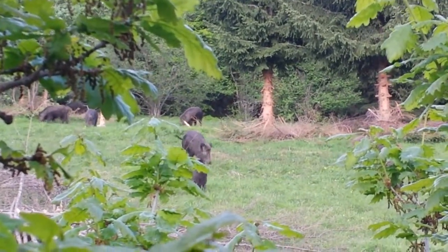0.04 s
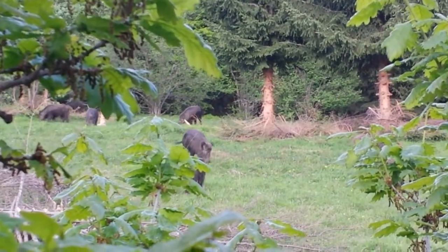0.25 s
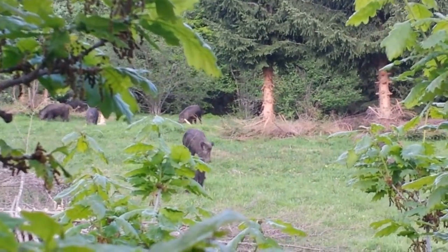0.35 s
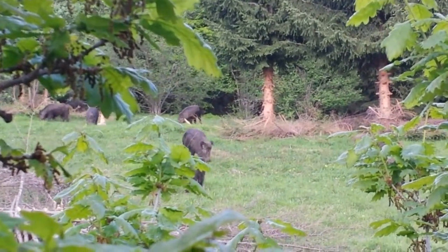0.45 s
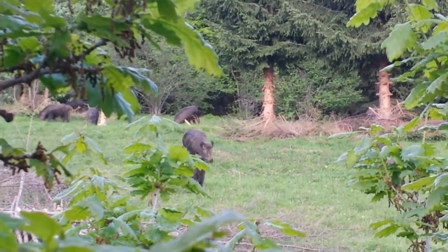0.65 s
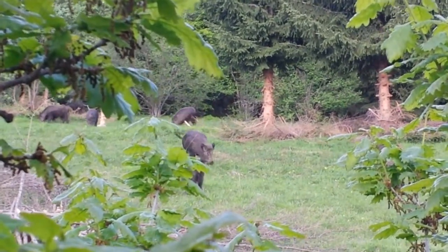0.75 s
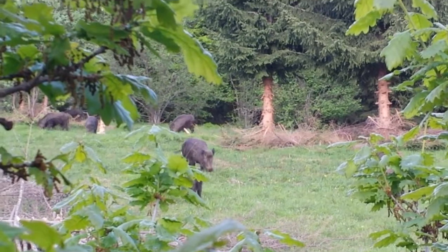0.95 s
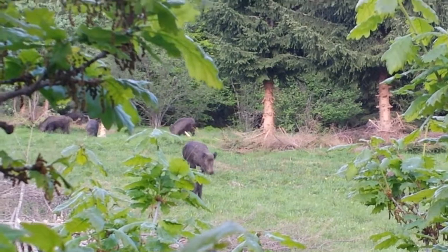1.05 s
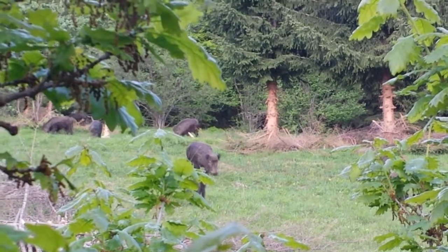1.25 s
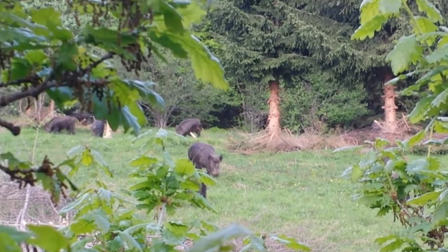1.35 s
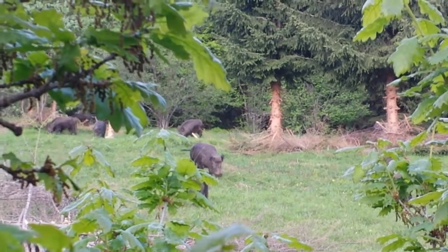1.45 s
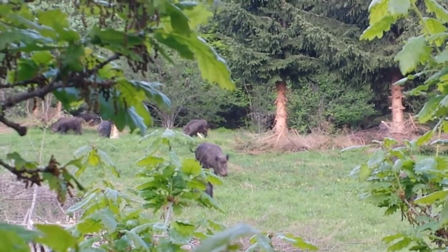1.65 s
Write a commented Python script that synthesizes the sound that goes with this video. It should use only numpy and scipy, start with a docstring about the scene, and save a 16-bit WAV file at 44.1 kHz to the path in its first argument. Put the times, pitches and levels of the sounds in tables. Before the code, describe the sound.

A songbird sings a chirpy phrase with a long high whistle, faint birds far behind.

```python
"""Faint, far-off bird calls come first, over soft outdoor hiss and a low hum at a forest edge.
Then a near songbird sings one phrase: a falling slur, thin chirps, a long high whistle and,
starting with a soft tick, a lower twitter. Each note is a gliding pure tone, at times two at once;
leaves scatter it and the trees answer with a long reverberant tail."""
import sys
import numpy as np
from scipy import signal
from scipy.fft import rfft, irfft
from scipy.io import wavfile
from scipy.ndimage import uniform_filter1d, map_coordinates

SR = 44100
rng = np.random.default_rng(int(sys.argv[2]) if len(sys.argv) > 2 else 0)


def generate_wav(signal):
    """Clip the signal to [-1, 1] and save it as 16-bit WAV at the path in sys.argv[1]."""
    frames = np.transpose(np.atleast_2d(signal))
    scaled = np.clip(frames, -1, 1) * 32767
    pcm = np.round(scaled).astype(np.int16)
    wavfile.write(sys.argv[1], SR, pcm)


N = 74970


def undb(db):
    """The decibel scale: 20 dB is a tenfold amplitude."""
    return 10 ** (np.asarray(db) / 20)


def pan(balance_db):
    """Interaural level difference: gains of constant power, the left greater by balance_db."""
    gains = undb(np.array([[balance_db], [-balance_db]]) / 2)
    return gains / np.sqrt(np.mean(gains ** 2))


def drift(rate_hz):
    """Low-pass noise: random steps smoothed into a slow wander of unit spread."""
    hold = max(int(SR / rate_hz), 2)
    steps = np.repeat(rng.standard_normal(N)[:N // hold + 1], hold)
    smooth = uniform_filter1d(uniform_filter1d(steps, hold), hold)[:N]
    return smooth / smooth.std()


def noise(spectrum, side_db=-1):
    """Spectral shaping: white noise filtered to a given spectrum, in wide stereo at unit level."""
    hz, db = np.array(spectrum, float).T
    bin_hz = np.arange(N // 2 + 1) * SR / N
    gain = undb(np.interp(np.log(bin_hz + 1), np.log(hz), db))
    mid, side = irfft(rfft(rng.standard_normal((2, N))) * gain, N)
    stereo = mid + undb(side_db) * side * np.array([[1], [-1]])
    return stereo / stereo.std()


# Partials of the hum: harmonic_number, relative_level_db
HUM_HARMONICS = [(1, -1.5), (2, -14.5), (3, -23), (4, -21), (5, -21.5)]
def hum(t, pitch_hz=216.84, waver=0.00586):
    """Harmonic series: partials at whole multiples of one slightly wavering fundamental."""
    phase = 2 * np.pi * np.cumsum(pitch_hz * (1 + waver * drift(rate_hz=16))) / SR
    return np.sqrt(2) * sum(undb(db) * np.sin(number * phase) for number, db in HUM_HARMONICS)


# Spectral densities of the three noise bands: frequency_hz, relative_level_db
AIR_SPECTRUM = [(100, -30), (220, 4), (320, 8), (500, -0.5), (1000, -3), (2000, -3), (3300, -1),
                (4500, -0.5), (7000, -3.5), (14000, -60)]
HISS_SPECTRUM = [(1000, -1), (4000, -24.5), (7000, 3), (10000, 0), (14500, -3.5)]
RUMBLE_SPECTRUM = [(20, -21), (50, -8.5), (95, -2), (160, -4.5), (240, -10), (400, -49.5)]
# Envelopes, before each layer's own gain: time_s, air_db, hiss_db, hum_db, rumble_db
BACKGROUND_LEVELS = [(0.0, -78, -77, -70.5, -75), (0.416, -68.5, -68.5, -65, -70),
                     (0.434, -68, -69, -64.5, -67.5), (0.62, -68.5, -68.5, -73.5, -69),
                     (0.638, -68, -67.5, -60.5, -68), (1.386, -70, -68, -61, -68.5),
                     (1.7, -78.5, -75.5, -68.5, -78.5)]
def background(t):
    """Amplitude envelopes: airy noise, hiss, rumble and a hum on the left each swell and sink."""
    time_s, *levels_db = np.array(BACKGROUND_LEVELS).T
    air_gain, hiss_gain, hum_gain, rumble_gain = (undb(np.interp(t, time_s, db)) for db in levels_db)
    drone = undb(1) * hum_gain * hum(t) * pan(29)
    air = undb(9) * air_gain * noise(AIR_SPECTRUM)
    hiss = undb(5.5) * hiss_gain * noise(HISS_SPECTRUM)
    rumble = undb(3) * rumble_gain * noise(RUMBLE_SPECTRUM)
    return air + hiss + rumble + drone


def tick(t, time_s=1.172, band_hz=2100, level_db=-54, width_s=0.0017):
    """A transient: band noise under a brief Gaussian envelope is heard as a soft dry tick."""
    band = [(band_hz / 4, -30), (band_hz * 0.6, 0), (band_hz * 1.05, 0), (band_hz * 4, -25)]
    return undb(level_db) * noise(band) * np.exp(-((t - time_s) / width_s) ** 2)


def scatter(sound, t60_s, delay_s, build_s):
    """Diffuse scattering: countless reflections build up and die away, different at each ear."""
    age_s = np.maximum(np.arange(N) / SR - delay_s, 0)
    envelope = (1 - np.exp(-age_s / build_s)) * np.exp(-np.log(1000) * age_s / t60_s)
    tail = rng.standard_normal((2, N)) * envelope
    tail /= np.sqrt(np.sum(tail ** 2, axis=1, keepdims=True))
    return signal.fftconvolve(sound[None], tail, axes=1)[:, :N]


def forest(sound, tilt_db_per_octave=-2.5):
    """Reverberation: the trees return a long tail, weaker for higher notes."""
    bin_hz = np.arange(N // 2 + 1) * SR / N
    octaves = np.log2(np.maximum(bin_hz, 2000) / 5000)  # flat below 2 kHz, unity gain at 5 kHz
    dulled = irfft(rfft(sound) * undb(tilt_db_per_octave * octaves), N)
    return scatter(dulled, t60_s=0.95, delay_s=0.012, build_s=0.0098) * pan(1)


def whistle(pitch_hz, rasp_hz=5430, rasp_width_hz=680, flutter_db=2.4):
    """Frequency and amplitude modulation: a pure tone wavers, flutters and rasps in mid register."""
    rasp = 0.0197 * np.exp(-((pitch_hz - rasp_hz) / rasp_width_hz) ** 2) * drift(rate_hz=670)
    waver = 0.0027 * drift(rate_hz=220)
    phase = 2 * np.pi * np.cumsum(pitch_hz * (1 + waver + rasp)) / SR
    return np.sqrt(2) * np.sin(phase) * undb(flutter_db * drift(rate_hz=120))


# Distant calls: start_s, length_s, first_hz, middle_hz, last_hz, level_db
DISTANT_CALLS = [ (.0, .06, 3950, 3750, 3800, -78), (.0, .03, 3280, 3250, 3240, -72),
                 (.035, .11, 3260, 3220, 3234, -75), (0.183, 0.049, 2850, 2390, 2550, -62.5),
                 (0.219, 0.029, 2650, 2720, 2780, -64), (0.466, 0.041, 3180, 3210, 3280, -67),
                 (0.598, 0.041, 2950, 2673, 3050, -59), (0.78, 0.076, 4400, 4360, 4290, -68.5),
                 (0.896, 0.13, 2480, 2464, 2437, -70.5), (0.959, 0.039, 3130, 3135, 3320, -68),
                 (1.102, 0.036, 2980, 2690, 2890, -61.5), (1.153, 0.024, 2900, 2947, 2800, -66),
                 (1.319, 0.017, 3300, 3286, 3100, -58), (1.375, 0.02, 3240, 3206, 3210, -57.5),
                 (1.432, 0.015, 3250, 2990, 3170, -64.5), (1.478, 0.044, 3180, 3280, 3390, -63),
                 (1.504, 0.054, 2880, 2500, 3030, -69), (1.565, 0.01, 2850, 2730, 2700, -57), ]
def far_birds(t, reverb_db=-2.5):
    """Direct-to-reverberant ratio: short curved whistles, about as strong as their tail, sound far."""
    calls = 0
    for start_s, length_s, first_hz, middle_hz, last_hz, level_db in DISTANT_CALLS:
        progress = np.clip((t - start_s) / length_s, 0, 1)
        parabola = np.polyfit([0, .5, 1], [first_hz, middle_hz, last_hz], 2)
        arch = np.sqrt(1 - (2 * progress - 1) ** 2)
        calls += whistle(np.polyval(parabola, progress)) * undb(level_db) * arch
    return calls + undb(reverb_db) * forest(calls)


# Notes of the phrase: balance_db, leaves_send_db, forest_send_db, glide
# Points along each glide: time_s, pitch_hz, level_db
SONG_NOTES = [ (-9, -14, -11, [(.168, 7000, -70), (.178, 5200, -68), (.181, 4500, -49), (.188, 4150, -47.5),
              (.203, 4020, -47), (.218, 3800, -48), (.229, 3740, -57)]), (4, -2, -11, [(.220, 4400, -68),
              (.234, 5900, -59), (.244, 5900, -64), (.256, 5900, -54), (.278, 5900, -56)]),
              (24, -3, 2.5, [(.237, 5226, -48), (.250, 5340, -52), (.258, 5370, -46.5), (.263, 5200, -55)]),
              (-11, -14, -8, [(.261, 5400, -62), (.270, 4334, -51), (.278, 3410, -56)]),
              (7.5, -9, -6, [(.324, 5700, -56), (.334, 6280, -39), (.340, 6285, -42), (.347, 6200, -35.5),
              (.361, 6200, -41), (.368, 6550, -54)]), (20, -8, -7, [(.408, 3700, -66), (.417, 5000, -48),
              (.428, 5100, -53), (.438, 5030, -44), (.449, 5420, -41), (.461, 5480, -42)]),
              (6, -9, 4, [(.423, 5900, -54), (.427, 5710, -46), (.440, 5500, -49)]),
              (7, -3, -6, [(.509, 3900, -66), (.516, 4700, -55), (.521, 5500, -56), (.529, 5600, -57)]),
              (0, -4, -8, [(.519, 3780, -63), (.524, 3560, -62), (.530, 3540, -66)]),
              (13, 5, -9, [(.520, 6800, -57), (.529, 7140, -58), (.536, 6600, -58)]),
              (4, -22, -7, [(.530, 5850, -51), (.535, 6245, -39), (.542, 6305, -43), (.548, 6232, -34),
              (.556, 6286, -43.5), (.564, 6300, -42)]), (-4, -2, -4, [(.615, 4300, -63), (.619, 6900, -53),
              (.629, 7720, -53), (.655, 7780, -51), (.675, 7940, -48), (.705, 7820, -53),
              (.735, 7880, -52)]), (-8, -6, -1, [(.755, 4700, -59), (.760, 6900, -48), (.767, 7250, -39),
              (.783, 7380, -45), (.795, 7540, -48), (.815, 7540, -48)]), (-12, -5, -9, [(.803, 7400, -46),
              (.832, 7250, -38), (.875, 7230, -38.5), (.895, 7220, -43), (.918, 7200, -37),
              (.945, 7160, -41.5), (.968, 7165, -40.5), (.992, 7145, -44), (1.04, 7125, -39.5),
              (1.086, 7120, -46), (1.091, 6400, -66)]), (10, -8, -8, [(1.164, 3360, -56),
              (1.170, 4387, -41), (1.1745, 5163, -45), (1.178, 4060, -42.5), (1.187, 4100, -40.5),
              (1.198, 4030, -41.5), (1.206, 3420, -47)]), (4, -9, -8, [(1.213, 3900, -53),
              (1.219, 4500, -45), (1.224, 4950, -57)]), (-9.5, -12, 7, [(1.221, 3780, -44.5),
              (1.226, 3570, -59.5), (1.231, 3500, -58)]), (2.5, -9, -9, [(1.246, 3450, -58),
              (1.252, 4210, -46.5), (1.2575, 4990, -48), (1.261, 3760, -45), (1.270, 3652, -46),
              (1.281, 3620, -45), (1.298, 3635, -54)]), (16, -7, -7, [(1.298, 4190, -52),
              (1.304, 4485, -43), (1.308, 4650, -42), (1.312, 4950, -54)]),
              (12, -6, -7, [(1.328, 3575, -53), (1.335, 4110, -44.5), (1.345, 4320, -54),
              (1.353, 4700, -58)]), (10, -4, -9, [(1.385, 4100, -55), (1.393, 3938, -46.5),
              (1.399, 3840, -56)]), (-4.5, -4, -1.5, [(1.441, 3900, -52), (1.449, 3817, -57),
              (1.459, 3980, -54.5)]), ]
def songbird(t, attack_s=0.0013, release_s=0.0016, left_lag_s=0.00002):
    """Multipath propagation: each gliding note arrives directly, then from leaves and from trees."""
    direct, into_leaves, into_forest = 0, 0, 0
    for balance_db, leaves_send_db, forest_send_db, glide in SONG_NOTES:
        time_s, pitch_hz, level_db = np.array(glide).T
        time_s = np.sort(time_s)
        rise = np.clip((t - time_s[0]) / attack_s + .5, 0, 1)
        fall = np.clip((time_s[-1] - t) / release_s + .5, 0, 1)
        envelope = undb(np.interp(t, time_s, level_db)) * np.sin(rise * fall * np.pi / 2) ** 2
        note = whistle(np.interp(t, time_s, pitch_hz)) * envelope
        direct += note * pan(balance_db)
        into_leaves += note * undb(leaves_send_db)
        into_forest += note * undb(forest_send_db)
    direct[0] = map_coordinates(direct[0], [(t - left_lag_s) * SR])  # reaches the left ear later
    leaves = scatter(into_leaves, t60_s=0.21, delay_s=0.0042, build_s=0.002)
    return direct + leaves + forest(into_forest)


def scene():
    """Superposition: the singer, its distant neighbours, the background and the tick add up."""
    t = np.arange(N) / SR
    return songbird(t) + far_birds(t) + background(t) + tick(t)


def record(dry):
    """Band limiting: a steep elliptic low-pass filter cuts the highest treble."""
    cutoff_hz = 14550
    return signal.sosfilt(signal.ellip(12, .1, 70, cutoff_hz, fs=SR, output="sos"), dry)


dry = scene()
out = record(dry)
generate_wav(out)
```